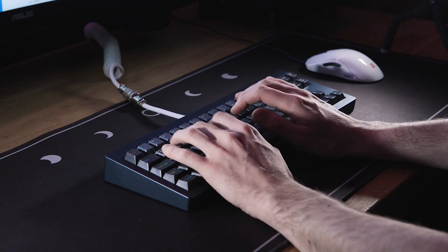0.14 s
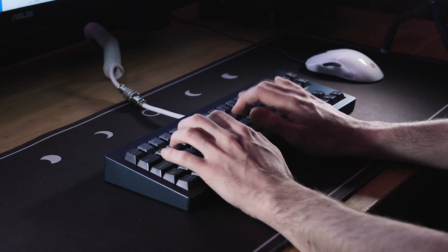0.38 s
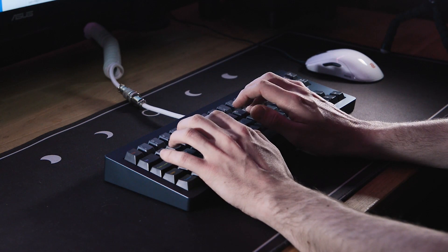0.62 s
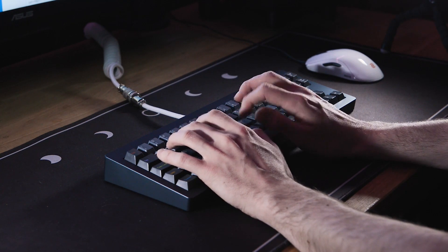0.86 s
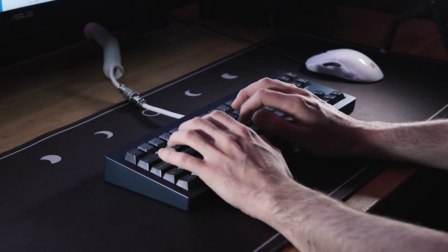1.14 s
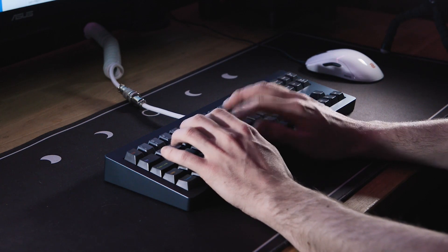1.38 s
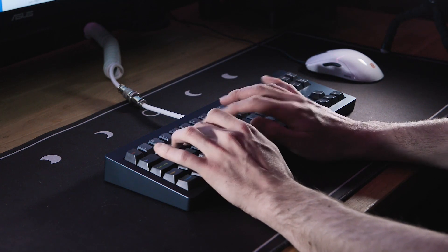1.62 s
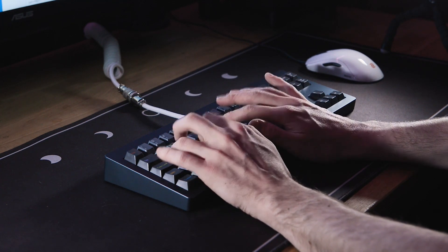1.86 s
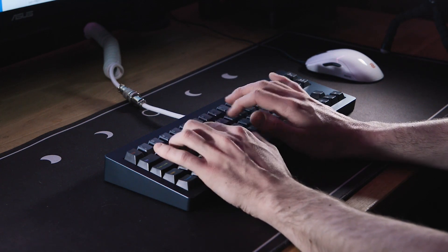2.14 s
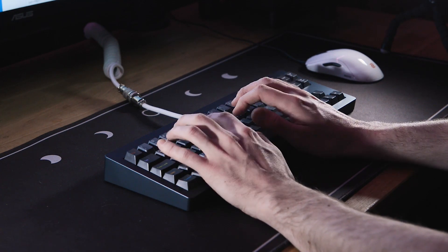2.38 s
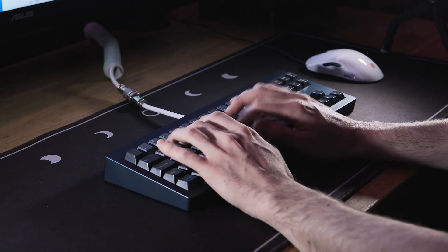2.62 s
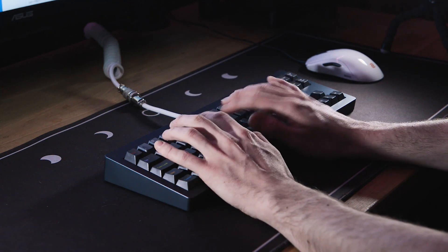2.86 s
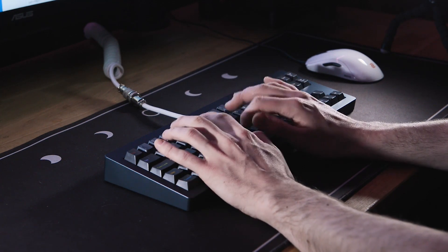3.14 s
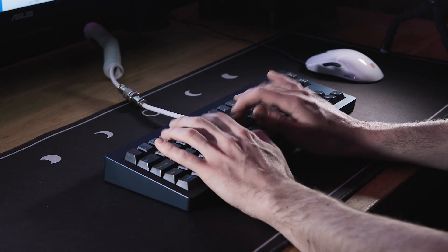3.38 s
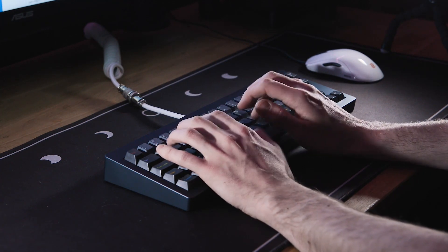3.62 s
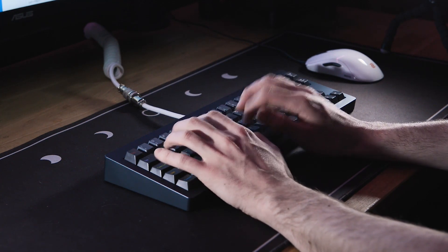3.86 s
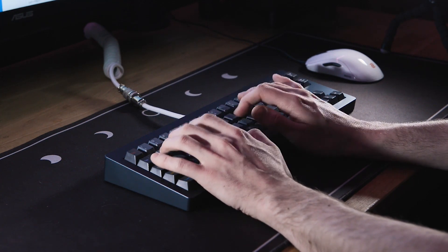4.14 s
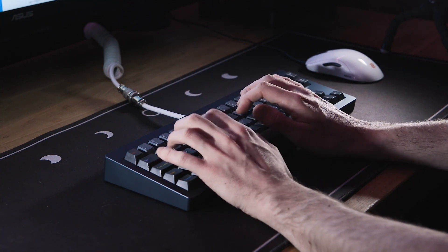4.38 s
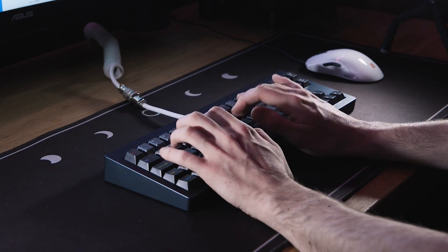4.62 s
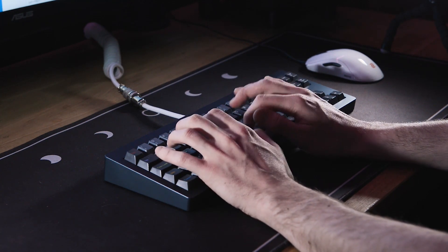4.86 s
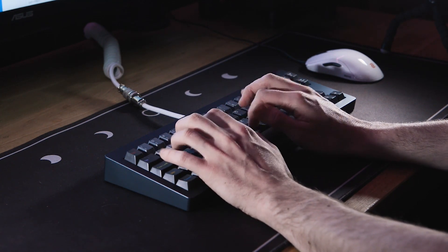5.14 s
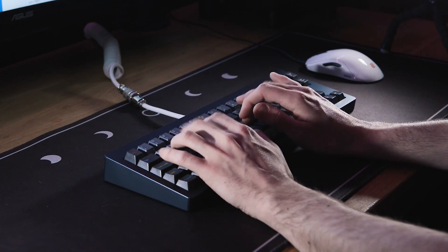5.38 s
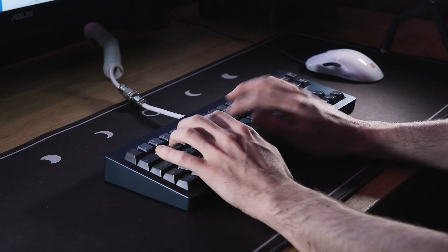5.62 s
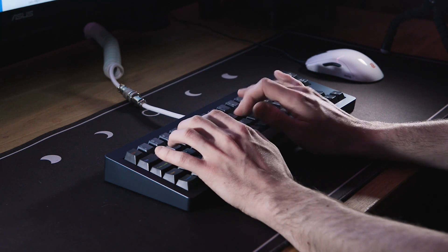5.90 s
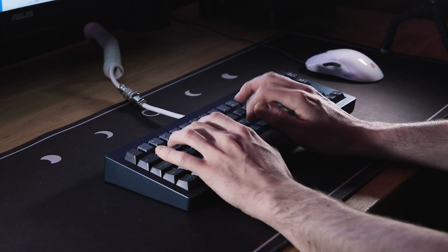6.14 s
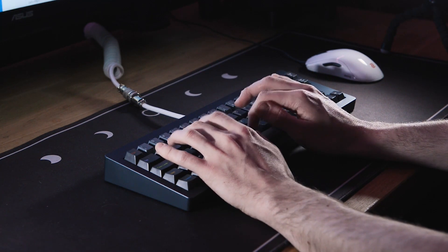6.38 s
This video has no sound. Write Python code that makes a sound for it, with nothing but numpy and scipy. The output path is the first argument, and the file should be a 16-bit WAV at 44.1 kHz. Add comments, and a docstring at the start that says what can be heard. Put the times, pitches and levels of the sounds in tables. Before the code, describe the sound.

Continuous rapid keystrokes on a mechanical keyboard, heard close in stereo. Each stroke has a short hollow pop, a knock of the case and a gritty click; lighter ticks and faint sliding fall between. Louder, slightly lower space bar strokes punctuate the flow. The pace thins briefly around the middle, then picks up to a firm finish. Dull desk thuds, short room tail, faint low hum and hiss.

```python
"""Fast typing on a mechanical keyboard on a desk mat, close to a stereo microphone in a small quiet room.
Each stroke pops a hollow cap (a few cycles and a faint ring), knocks the case (damped modes)
and cracks and ticks in the housing and switch (filtered noise). Stems slide faintly before some strokes.
The desk shudders in two low wavering notes; a faint low hum and air hiss (shaped noise) lie under it."""
import sys
import numpy as np
from scipy import signal
from scipy.fft import irfft
from scipy.io import wavfile
from scipy.ndimage import uniform_filter1d

SR = 44100
rng = np.random.default_rng(int(sys.argv[2]) if len(sys.argv) > 2 else 0)


def materialize(psi):
    """Save the field psi as 16-bit PCM at rate SR to the path in sys.argv[1].

    A 1-D psi becomes a single channel; in a 2-D psi each row is a channel.
    """
    bounded = np.clip(np.atleast_2d(psi).T, -1, 1)
    quanta = np.round(bounded * 32767).astype(np.int16)
    wavfile.write(sys.argv[1], SR, quanta)


def invert_db(x):
    """Field ratio 10**(x/20) for x, a level in decibels (scalar or array-like)."""
    u = np.asarray(x, float) / 20
    return 10 ** u


N = 287091  # length in samples


def read(points, hz):
    """Interpolation of a spectrum: straight lines over log frequency."""
    point_hz, value = np.transpose(points)
    return np.interp(np.log(hz + 1), np.log(point_hz + 1), value)


def evened(x):
    """Normalisation to an rms of 1."""
    return x / np.sqrt(np.mean(x ** 2) + 1e-20)


def add(mix, start_s, sound):
    """Superposition: sound is summed into mix from start_s."""
    part = mix[max(round(start_s * SR), 0):][:len(sound)]
    part += sound[:len(part)]


def coloured(x, points):
    """Linear filtering by a short symmetric impulse response with the given spectrum."""
    gain = invert_db(read(points, np.fft.rfftfreq(256, 1 / SR)))
    response = np.roll(irfft(gain), 128) * np.hanning(256)
    return signal.oaconvolve(x, response, "same")


# Spectrum of air hiss and low drone. Each row: frequency in Hz, relative density in dB.
HUM_SPECTRUM = [(15, -43), (30, -10.5), (48, 8.5), (62, 0.5), (120, -6), (200, -0.5), (245, -3.5),
                (310, -12.5), (490, -14), (840, -22.5), (1200, -25.5), (2600, -31), (3300, -36),
                (5900, -45.5), (11000, -46.5), (14800, -49), (16000, -64)]
# Likeness of the two channels of the hum. Each row: frequency in Hz, correlation from 0 to 1.
HUM_LIKENESS = [(60, 0.25), (130, 1), (290, 0.8), (640, 0.57), (1400, 0.14), (3100, 0.077), (6800, 0.94),
                (15000, 1)]


def hum(level_db=-46.5):
    """Stationary noise: random short-time spectra, partly correlated between left and right."""
    frames, hz = N // 512 + 5, np.fft.rfftfreq(2048, 1 / SR)
    a, b, c, d = rng.standard_normal((frames, 1025, 4)).T
    same = np.clip(read(HUM_LIKENESS, hz), -1, 1)[:, None]
    left = a + 1j * b
    right = same * left + np.sqrt(1 - same ** 2) * (c + 1j * d)
    spectra = np.array([left, right]) * invert_db(read(HUM_SPECTRUM, hz))[:, None]
    noise = signal.istft(spectra, nperseg=2048, noverlap=1536)[1][:, :N]
    return invert_db(level_db) * evened(noise)


def shudder(peaks_s, peaks_db, swell_db_per_s=258, fade_db_per_s=252, rest_db=-60.5):
    """Energy summation: each jolt swells to its peak and dies away, and the powers add."""
    t = np.arange(0, N + 64, 64) / SR
    late = t - peaks_s[:, None]
    fall_db = np.where(late < 0, -swell_db_per_s, fade_db_per_s) * late
    power = invert_db(peaks_db[:, None] - fall_db) ** 2
    level = np.sqrt(power.sum(0) + invert_db(rest_db) ** 2)
    return np.interp(np.arange(N) / SR, t, level)


# Jolts of the desk by the hands. Each row: peak in seconds, lower mode rms in dB, upper mode rms in dB.
DESK_JOLTS = [(.03,-55,-64),(.09,-51,-43),(.16,-37,-45),(.23,-42,-43),(.33,-48,-51),(.52,-46,-68),(.62,-51,-61),(.73,-41.5,-59),
              (.96,-37.5,-57),(1.1,-41,-37.5),(1.21,-42,-46),(1.3,-48,-68),(1.49,-56,-55),(1.61,-37,-51),(1.67,-31,-44),(1.79,-53,-44),(1.87,-44,-45),
              (1.95,-40,-39.5),(2.1,-57,-61),(2.17,-34,-40.5),(2.24,-39,-47),(2.3,-38,-54),(2.6,-53,-52),(2.7,-44,-36.5),(2.74,-54,-36.5),(2.79,-35.5,-47),
              (2.88,-53,-60),(3.04,-62,-60),(3.23,-45.5,-46),(3.35,-38,-40),(3.58,-54,-50),(3.66,-43,-51),(3.98,-54,-43),(4.06,-44.5,-40),(4.17,-48,-45),
              (4.3,-41,-37),(4.39,-41,-45),(4.68,-54,-56),(4.91,-58,-49),(5.02,-49,-54),(5.09,-54,-46),(5.26,-46,-54),(5.35,-35,-53),(5.41,-42,-50),
              (5.51,-59,-43),(5.56,-40.5,-48),(5.65,-47,-57),(5.8,-43,-55),(5.97,-55,-46.5),(6.12,-46,-43),(6.22,-41,-40),(6.3,-39.5,-57),(6.38,-48,-46),
              (6.45,-40,-40),(6.51,-30.5,-47)]
# The two low modes of the desk. The entries: mean frequency in Hz of the lower, then of the upper.
DESK_MODES = (73.6, 93.2)


def desk(apart_rad=1.0, wander_hz=4.18):
    """Low structural modes with wandering pitch, not quite in phase at the two capsules."""
    peaks_s, *levels_db = np.transpose(DESK_JOLTS)
    out = np.zeros((2, N))
    for hz, db in zip(DESK_MODES, levels_db):
        noise = rng.standard_normal((2, N))
        drift = evened(uniform_filter1d(uniform_filter1d(noise, 3000), 3000))
        turns = np.cumsum(hz + wander_hz * drift[0]) / SR
        apart = np.outer([.5, -.5], apart_rad * drift[1])
        out += np.sqrt(2) * shudder(peaks_s, db) * np.sin(2 * np.pi * turns + apart)
    return out


# Letter keys, down and back up. Each row: start in seconds, cap pop in dB, cap pitch in Hz,
# case knock in dB, switch tick in dB before its colour.
LETTERS = [(.009,-52,2520,-42,-69),(.0226,-24.5,2480,-34.5,-34.5),(.0792,-19,2800,-35,-33),(.1523,-30.5,2670,-41,-49),
           (.1593,-51,1510,-40,-52),(.269,-32.5,2730,-39.5,-42),(.4187,-54,3320,-60,-58),(.4601,-24,2740,-32.5,-34.5),(.5717,-31,2970,-35,-43.5),
           (.6508,-47,3640,-45,-56),(.6741,-23.5,2850,-34.5,-35.5),(.8309,-35.5,1460,-40.5,-48),(.8921,-31,2860,-42.5,-64),(1.009,-29,1750,-34.5,-41),
           (1.0186,-23,1500,-30.5,-30),(1.1033,-61,1830,-49.5,-71),(1.1446,-38,1520,-37.5,-45),(1.3363,-44,2640,-49,-59),(1.4918,-39,1550,-47.5,-56),
           (1.5096,-27.5,3010,-37,-38.5),(1.5789,-17,2600,-36.5,-31.5),(1.6114,-26.5,3090,-36.5,-46),(1.734,-35,2700,-40.5,-46),(1.7564,-40,1530,-36,-39),
           (1.775,-24.5,2700,-38,-37),(1.8379,-62,3420,-71,-53),(1.8604,-26,2870,-37,-38),(1.919,-51,3600,-55,-53),(1.9315,-21.5,2600,-30.5,-30.5),
           (1.9866,-27,2500,-35,-34.5),(2.084,-48,1510,-42.5,-48),(2.1018,-28,1660,-37.5,-36),(2.1143,-22.5,2870,-36,-39),(2.1862,-22,2720,-39,-33.5),
           (2.2604,-46,2080,-43.5,-62),(2.3199,-28,2640,-35.5,-39),(2.4,-54,2260,-55,-57),(2.5775,-37.5,1740,-48,-45.5),(2.593,-23,3260,-39,-41.5),
           (2.641,-57,1510,-48,-54),(2.6519,-18,2620,-38,-30),(2.6994,-29,2820,-36.5,-39.5),(2.7693,-25,2670,-36,-36),(2.893,-50,2340,-60,-55),
           (2.968,-39,1570,-42.5,-45),(3.006,-59,1690,-50,-52),(3.0523,-40,2990,-41,-63),(3.0688,-25.5,3300,-29.5,-30.5),(3.1513,-34,1630,-46.5,-46),
           (3.1714,-28.5,2100,-36.5,-38),(3.2566,-29,2140,-36,-33),(3.2827,-7,2550,-25.5,-25),(3.355,-40,1520,-44,-41),(3.3681,-31.5,2930,-36,-46),
           (3.3891,-32.5,2970,-41.5,-48),(3.4726,-38,2680,-32.5,-37.5),(3.5722,-45,2906,-35,-48),(3.581,-19.5,2720,-29,-29),(3.7159,-42,3020,-37,-51),
           (3.763,-50,3340,-67,-69),(3.9414,-51,1510,-60,-57),(3.965,-40,1570,-39,-42),(3.9732,-27.5,2060,-31.5,-36.5),(4.0549,-36,2300,-32,-32.5),
           (4.1471,-32,1690,-50,-47),(4.1524,-21,2710,-30,-27),(4.2227,-33,2980,-39.5,-40.5),(4.273,-30,2880,-39.5,-47),(4.346,-33,2890,-39.5,-43.5),
           (4.4481,-34,3120,-40.5,-50),(4.6526,-50,1630,-51,-53),(4.6722,-27.5,2610,-38.5,-40),(4.6954,-56,2900,-45.5,-62),(4.7789,-29,2670,-36,-38.5),
           (4.8512,-37.5,1610,-40,-45.5),(4.8726,-42,2170,-45,-53),(4.965,-42,1780,-35.5,-46),(4.9748,-43,1510,-39,-39.5),(5.1654,-39,1520,-39.5,-39),
           (5.18,-24.5,2390,-35.5,-55),(5.2562,-36,1650,-40.5,-46.5),(5.283,-25.5,2600,-44,-36),(5.2936,-49,2670,-32.5,-38),(5.3584,-40,1450,-42.5,-42),
           (5.3725,-24.5,2840,-32,-38.5),(5.3937,-29.5,2680,-44,-41),(5.4534,-61,2750,-55,-58),(5.475,-22,2810,-36,-44),(5.4831,-34,1530,-36.5,-38),
           (5.5996,-41,2460,-40.5,-47.5),(5.7054,-52,2480,-55,-56),(5.7301,-37,1580,-47,-46),(5.7434,-25,2810,-35,-36),(5.826,-35,2700,-39.5,-39.5),
           (5.8963,-46,1630,-48,-39),(5.907,-20.5,2700,-33,-32),(6.005,-26,2730,-36.5,-42),(6.0443,-60,1470,-40,-40),(6.0539,-19,2410,-35.5,-36.5),
           (6.1455,-26.5,2550,-38,-40.5),(6.1883,-42,2650,-38.5,-36),(6.2852,-31,2720,-40.5,-46),(6.357,-56,2280,-55,-53),(6.3651,-13.5,2270,-32.5,-19.5),
           (6.4432,-20.5,2730,-37,-31.5),(6.4916,-36,2180,-37.5,-38)]
# The thumb on the space bar. Each row: start in seconds, cap pop in dB.
SPACE_BAR = [(0.2155,-15),(1.16,-11),(2.2374,-13),(2.733,-10),(3.811,-25.5),(4.3,-11),(5.0005,-13.5),(5.538,-14),(6.21,-9)]


def strokes():
    """Scaling of crack with force: rows of s, pop dB, Hz, case dB, crack dB, tick dB."""
    space_hz = 2111  # one shared pitch for the space bar
    rows = list(LETTERS)
    for s, db in SPACE_BAR:
        growth_db = max(db + 13, 0)  # extra tick in pops above -13 dB
        rows.append((s, db, space_hz, db - 21.5, db - 40.5 + growth_db))
    s, pop_db, hz, case_db, tick_db = np.transpose(rows)
    # the housing cracks more with force, brightness and low cap pitch
    crack_db = -8.5 + 0.61 * pop_db + 0.4 * tick_db - np.log2(hz / space_hz)
    crack_db[len(LETTERS):] -= 5  # the long bar cracks less than a letter key
    return np.transpose([s, pop_db, hz, case_db, crack_db, tick_db])


def bounces(rattle_ms, luck):
    """Repeated impact: a first contact and weaker ones as the key settles."""
    train = np.zeros(1000)
    train[0] = 1
    late_s = 0.00158 + luck * 0.011
    train[np.minimum(late_s * SR, 999).astype(int)] = np.exp(-late_s * 1000 / rattle_ms)
    return train


def cap(hz, pop_db, hard_db, luck, ring_db=-17, ring_t60=0.054, ring_spread=0.28, thud_db=-26, thud_hz=465):
    """Resonance of a hollow cap: a few cycles of pop, then a faint ring of its walls in a blurred cluster."""
    t = np.arange(1500) / SR
    # a louder tick goes with a shorter, broader pop
    cycles = np.clip(4.0 - 0.032 * hard_db - 0.032 * pop_db, 2.5, 7)
    pop = np.sin(np.pi * np.minimum(t * hz / cycles, 1)) ** 2 * np.sin(2 * np.pi * hz * t)
    blur = 0.09 * np.cumsum(rng.standard_normal((len(luck), len(t))), 1)  # radians, a random walk
    wall_ratio = 1 + ring_spread * (luck - .5)
    walls = np.sin(2 * np.pi * hz * np.outer(wall_ratio, t) + blur).sum(0) / 2
    ring = invert_db(ring_db - 60 * t / ring_t60) * np.minimum(t * hz / 2, 1) * walls
    # the board sinks into the mat
    thud = invert_db(thud_db - 60 * t / 0.045) * np.minimum(t / 0.0063, 1) * np.sin(2 * np.pi * thud_hz * t)
    return pop + ring + thud


# Modes of the case and plate. Each row: frequency in Hz before detuning, level in dB before its
# random spread and the knock level, decay time t60 in seconds.
CASE_MODES = [(780, -12, 0.026), (1027, -12, 0.031), (1181, -1, 0.025), (1232.3, -6.5, 0.065),
              (1440, -6.5, 0.036), (1520, -1.5, 0.025), (1830, 2.5, 0.023), (2100, -11, 0.063),
              (2550, -3.5, 0.028), (2977, -12, 0.13), (3215, -10, 0.032), (3510, -19, 0.074),
              (4840, -7, 0.01)]


def case(luck, rise_s=0.0012, spread_db=11.5, blur_rad=0.1):
    """Modal superposition: each key sits over another spot of the plate; loose parts blur the pitch."""
    t = np.arange(4000) / SR
    hz, db, t60 = np.transpose(CASE_MODES)[:, :, None]
    level, detune = luck.reshape(2, -1, 1) - .5
    steps = rng.standard_normal((len(CASE_MODES), len(t)))
    blur = blur_rad * np.sqrt(hz / 1000) * np.cumsum(steps, 1)  # blur_rad is the step a sample at 1 kHz
    tones = np.sin(2 * np.pi * hz * (1 + 0.0672 * detune) * t + blur)
    modes = invert_db(db + spread_db * level - 60 * t / t60) * tones
    return modes.sum(0) * (1 - np.exp(-t / rise_s))


# Stems sliding in their switches before a stroke lands. Each row: start in seconds, length in seconds,
# level in dB before the tick colour.
STEM_SLIDES = [(0.437, 0.016, -63), (.548, 0.013, -65), (0.793, .035, -71), (.865, 0.043, -66),
               (1.35, 0.017, -73), (2.074, .015, -77), (3.03, 0.0062, -73), (3.933, 0.016, -63),
               (4.749, 0.023, -65), (5.982, .02, -63)]


def slides():
    """Sliding friction: smooth envelopes for scratchy noise."""
    out = np.zeros(N)
    for s, length_s, db in STEM_SLIDES:
        add(out, s, invert_db(db) * signal.windows.tukey(round(length_s * SR), .6))
    return out


def grit():
    """Granular contact: three noises under one level that fluctuates in millisecond grains."""
    noise = rng.standard_normal((3, N))
    grains = evened(uniform_filter1d(rng.standard_normal(N), size=40))
    return noise * invert_db(3.55 * grains - 2.5)


# Colour of the housing crack. Each row: frequency in Hz, filter gain in dB.
CRACK_COLOUR = [(1500, -17), (3000, 16), (3700, 20.5), (4300, 12), (4900, 13), (5600, -2), (6500, 4),
                (7500, 0), (9000, -38)]
# Colour of the switch tick and slide. Each row: frequency in Hz, filter gain in dB.
TICK_COLOUR = [(4500, -2), (6000, 0), (7300, 5), (8800, 5), (9700, 5), (10500, 10), (11400, 3.5),
               (13500, -11), (15500, -18), (17000, -49)]


def keys():
    """Impact excitation: each contact train drives cap, case, housing crack and switch tick."""
    caps, knocks, cracks, ticks = np.zeros((4, N))
    hits = strokes()
    luck, t = rng.random((len(hits), 8 + 2 * len(CASE_MODES))), np.arange(2000) / SR
    for (s, pop_db, hz, case_db, crack_db, tick_db), row in zip(hits, luck):
        hard_db = tick_db - pop_db
        rattle_ms = np.clip(3.0 + 0.045 * hard_db, .5, 8)  # a bright tick means a loose key, rattling longer
        train = bounces(rattle_ms, row[:4])
        add(caps, s, invert_db(pop_db) * signal.fftconvolve(cap(hz, pop_db, hard_db, row[4:8]), train))
        add(knocks, s, invert_db(case_db) * signal.fftconvolve(case(row[8:]), train))
        burst = np.exp(-t / 0.00073) * np.minimum(t / 0.00031, 1)
        snap = signal.fftconvolve(burst, train)[:len(t)]
        add(cracks, s, invert_db(crack_db) * (snap + 0.17 * np.exp(-t * 1000 / (1.6 * rattle_ms))))
        add(ticks, s, invert_db(tick_db) * (snap + 0.24 * np.exp(-t * 1000 / (2.87 * rattle_ms))))
    ticks += slides()
    crack_grit, tick_grit, scatter_grit = grit()
    # short waves reach the two capsules by unlike paths
    scatter = invert_db(-13.5) * coloured(ticks * scatter_grit, TICK_COLOUR)
    clacks = caps + coloured(cracks * crack_grit, CRACK_COLOUR) + coloured(ticks * tick_grit, TICK_COLOUR)
    return clacks, knocks, scatter


# Decay of the room. Each row: frequency in Hz, decay time t60 in seconds.
ROOM_DECAY = [(400, 0.24), (1100, 0.25), (2200, 0.23), (4000, 0.29), (8000, 0.19), (14000, 0.3)]
# Side level of the tail by band. Each row: frequency in Hz, side minus mid in dB.
TAIL_SIDE_LEVEL = [(500, -4.5), (2500, -4), (5000, -2.5), (7000, -29), (15000, -21)]


def tail(tail_db=-10):
    """Reverberant decay: sparse taps of random sign, dying band by band, nearly mono above 6 kHz."""
    at = np.arange(200, SR // 2 - 20, 20) + rng.integers(0, 20, (2, (SR // 2 - 201) // 20))
    taps = np.zeros((2, SR // 2))
    np.put_along_axis(taps, at, rng.choice([-1., 1.], at.shape), 1)
    hz, t, (mid, side) = signal.stft(taps, SR, nperseg=256)
    side = side * invert_db(read(TAIL_SIDE_LEVEL, hz))[:, None]
    decay = invert_db(-60 * t / read(ROOM_DECAY, hz)[:, None])
    out = signal.istft(np.array([mid + side, mid - side]) * decay, SR, nperseg=256)[1]
    return invert_db(tail_db) * out / np.linalg.norm(out[0])


# Phase lead of the left capsule over the right. Each row: frequency in Hz, lead in radians.
CAPSULE_LEAD = [(300, 0.44), (1400, 0.39), (3000, 0.41), (6000, 1.2), (9000, 0.19), (15000, 1.8)]


def room(x):
    """Direct and reverberant field: phase-shifted direct sound and two tails that trade places."""
    lead = np.outer([.5j, -.5j], read(CAPSULE_LEAD, np.fft.rfftfreq(128, 1 / SR)))
    response = np.roll(irfft(np.exp(lead)), 64, 1) * np.hanning(128)
    out = signal.oaconvolve(x, response, axes=1)[:, 64:N + 64]
    turn = 2 * np.pi * 3.1 * np.arange(N) / SR  # 3.1 turns a second, so strokes get unlike tails
    for share in (np.cos(turn), np.sin(turn)):
        out += signal.oaconvolve(share * x, tail(), axes=1)[:, :N]
    return out


def scene():
    """Superposition of keys in the room, desk and hum; the case radiates a little more to the right."""
    clacks, knocks, scatter = keys()
    left = clacks + invert_db(-0.5) * knocks + scatter
    right = clacks + invert_db(0.5) * knocks - scatter
    return room(np.array([left, right])) + desk() + hum()


def low_pass(x):
    """Removes everything above the highest recorded frequency."""
    return signal.sosfilt(signal.butter(12, 16520, fs=SR, output="sos"), x)


def record(dry):
    """High-pass filtering: the mix is thinned below 42 Hz."""
    low_cut = signal.butter(4, 42, "highpass", fs=SR, output="sos")
    mix = signal.sosfilt(low_cut, dry)
    return low_pass(mix)


dry = scene()
out = record(dry)
materialize(out)
```